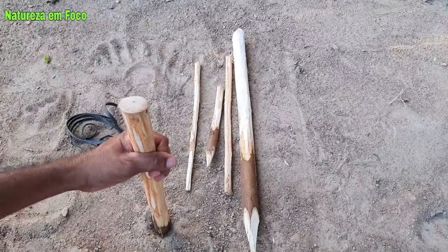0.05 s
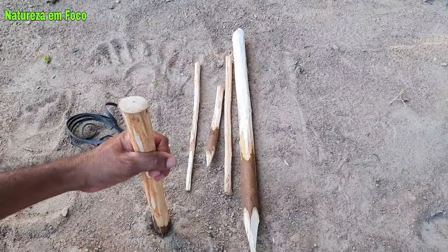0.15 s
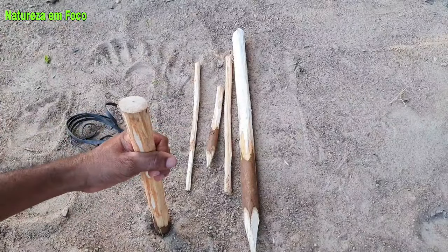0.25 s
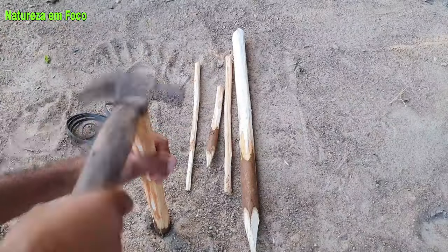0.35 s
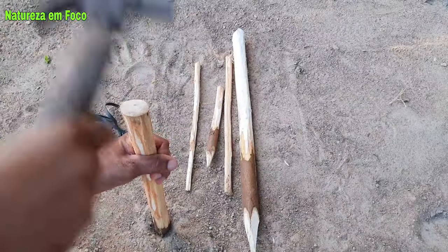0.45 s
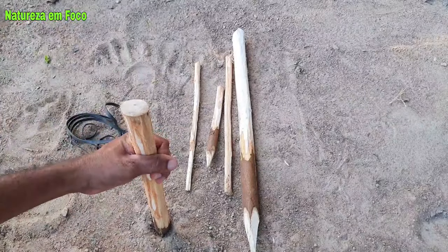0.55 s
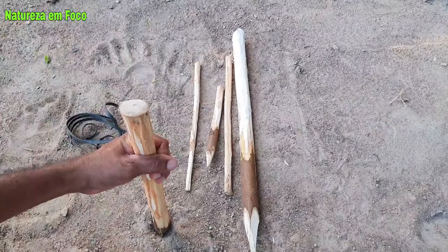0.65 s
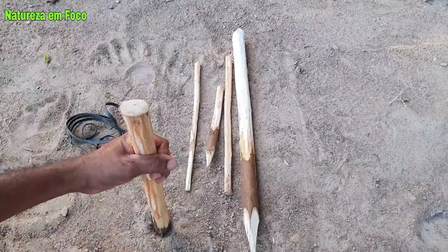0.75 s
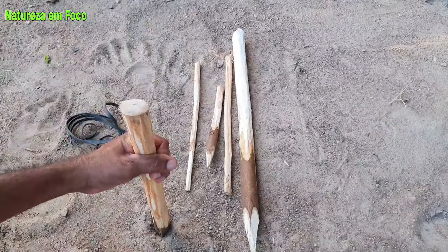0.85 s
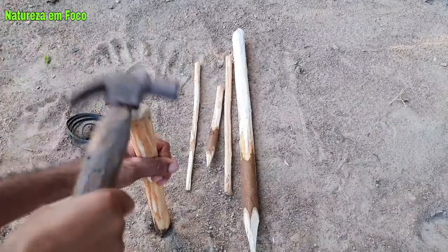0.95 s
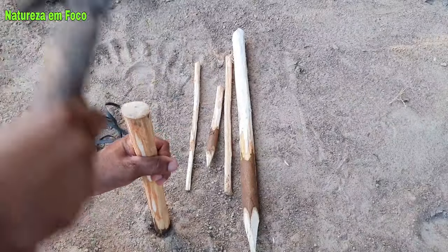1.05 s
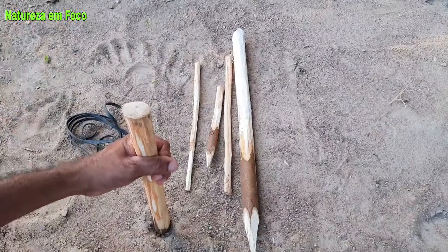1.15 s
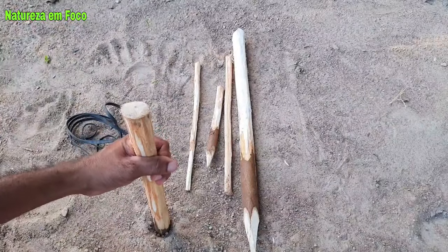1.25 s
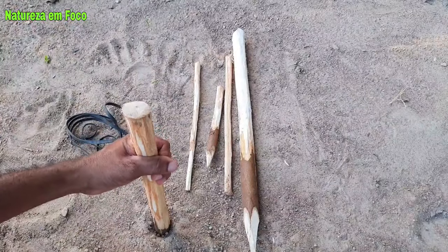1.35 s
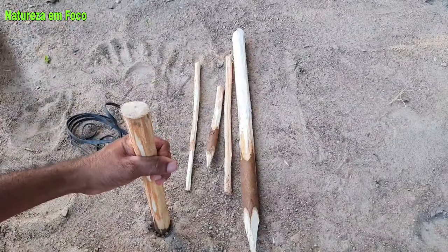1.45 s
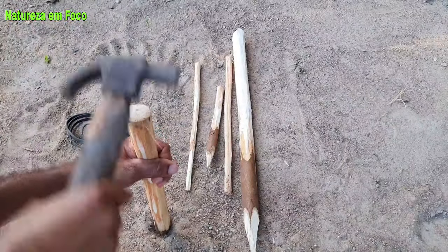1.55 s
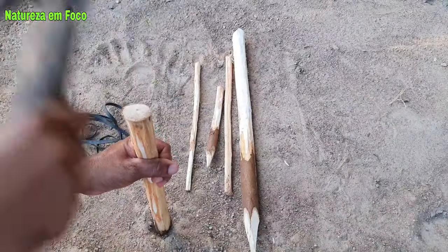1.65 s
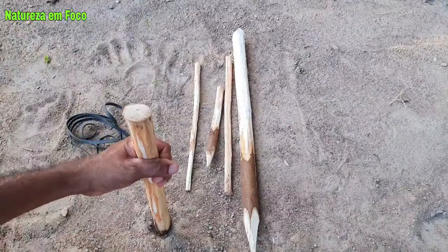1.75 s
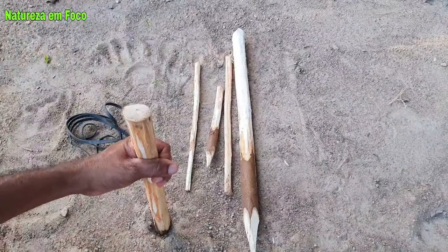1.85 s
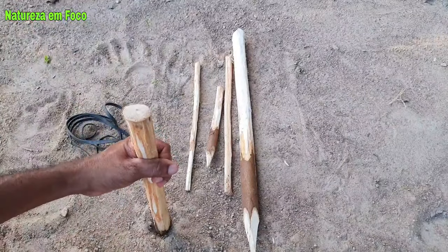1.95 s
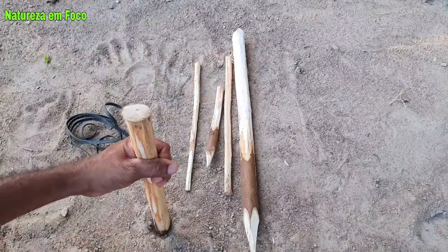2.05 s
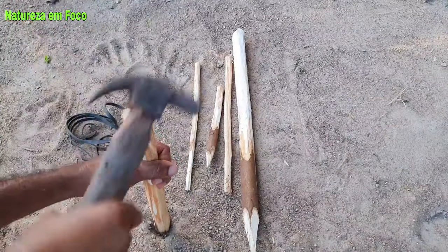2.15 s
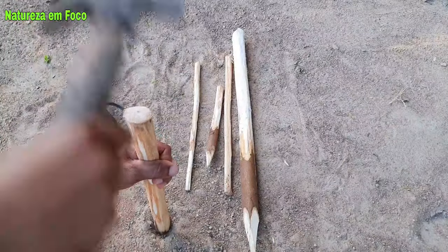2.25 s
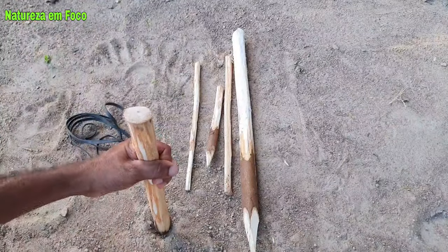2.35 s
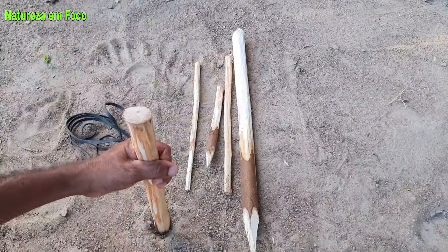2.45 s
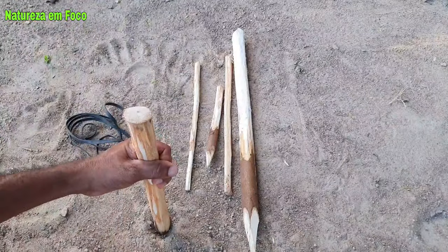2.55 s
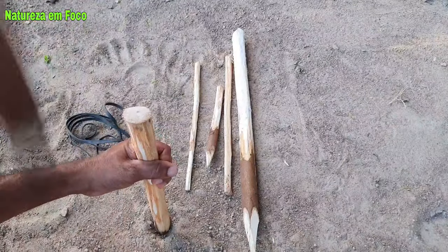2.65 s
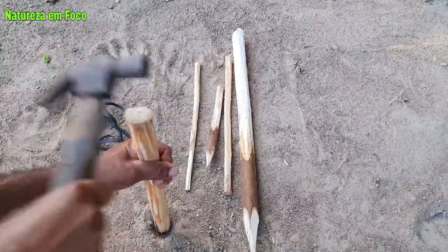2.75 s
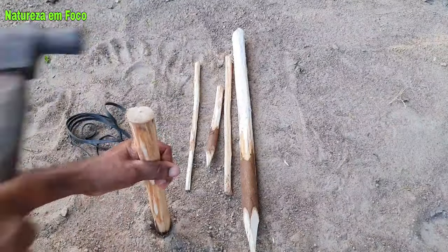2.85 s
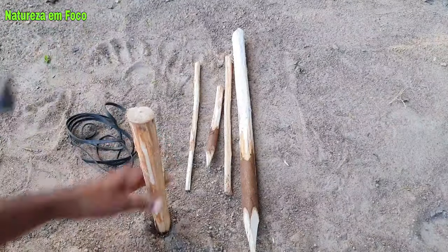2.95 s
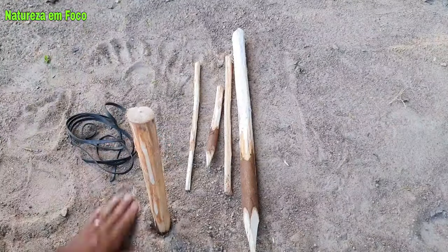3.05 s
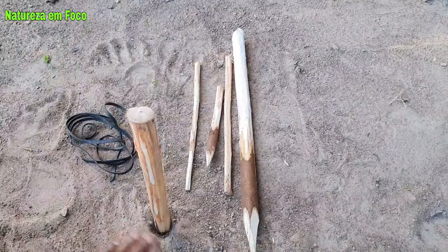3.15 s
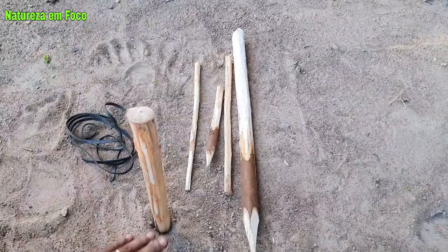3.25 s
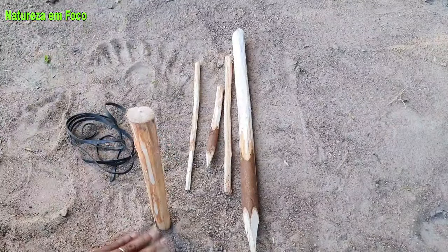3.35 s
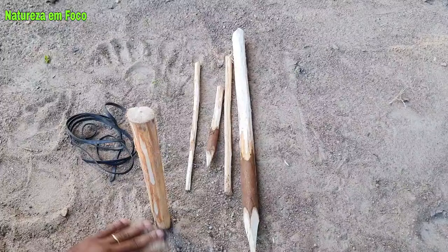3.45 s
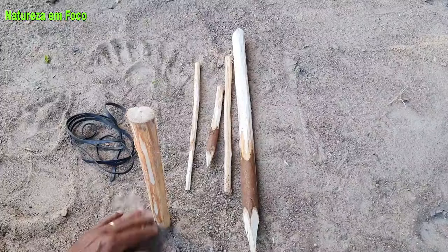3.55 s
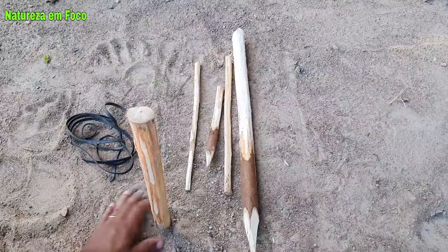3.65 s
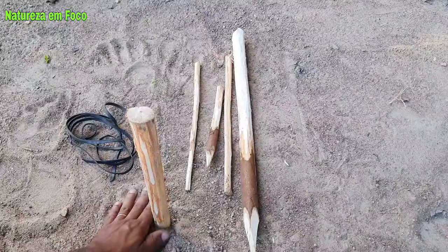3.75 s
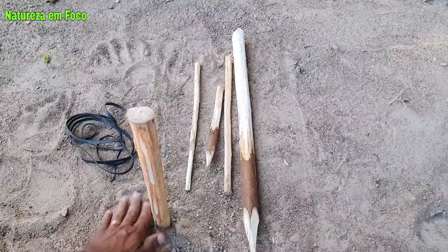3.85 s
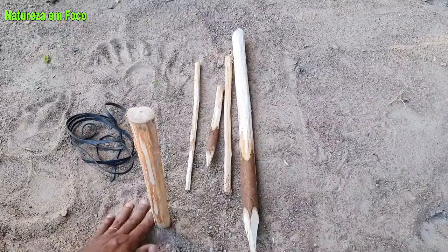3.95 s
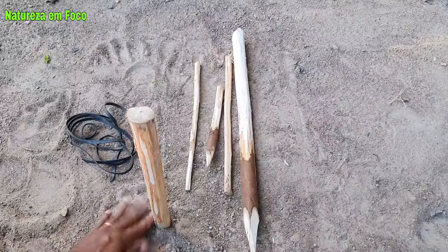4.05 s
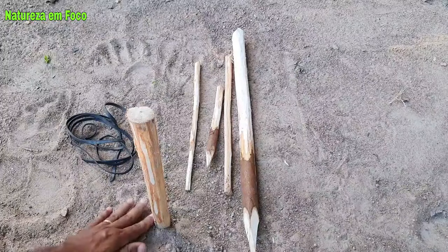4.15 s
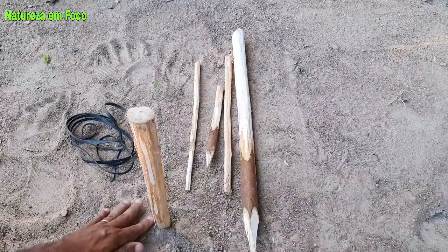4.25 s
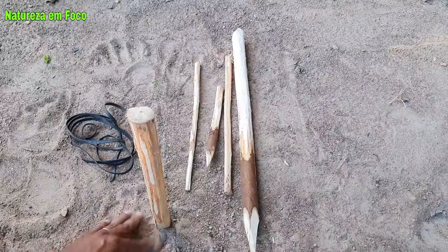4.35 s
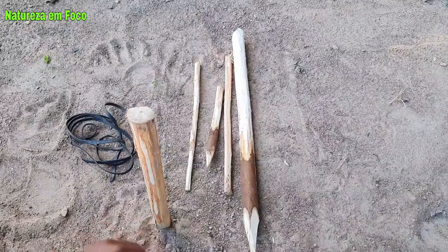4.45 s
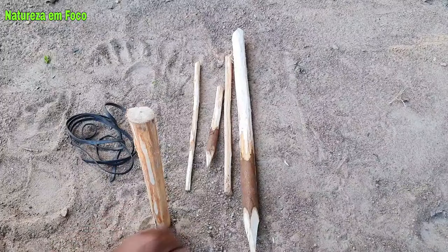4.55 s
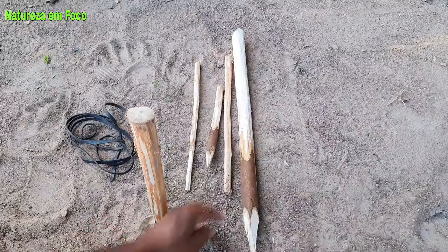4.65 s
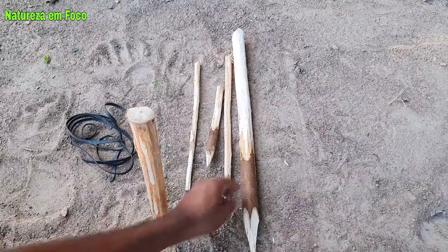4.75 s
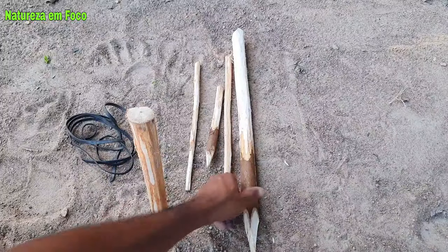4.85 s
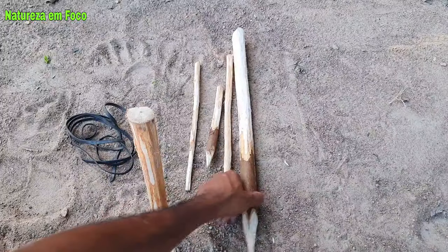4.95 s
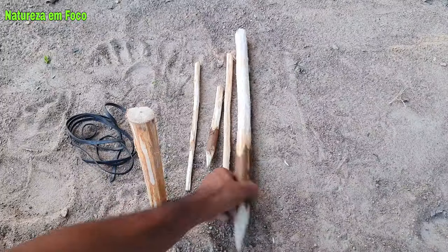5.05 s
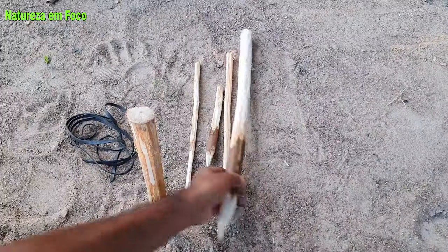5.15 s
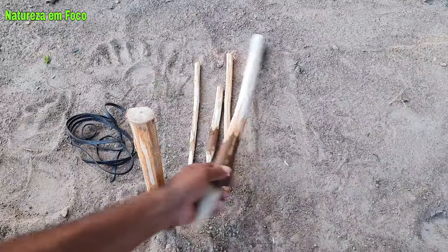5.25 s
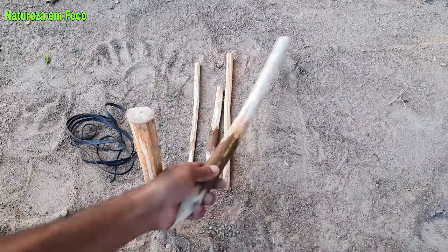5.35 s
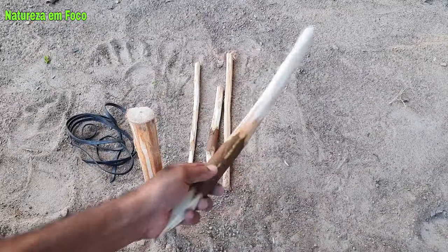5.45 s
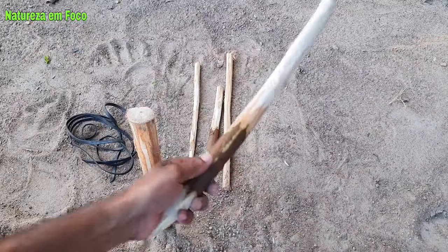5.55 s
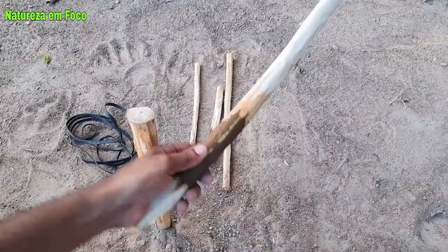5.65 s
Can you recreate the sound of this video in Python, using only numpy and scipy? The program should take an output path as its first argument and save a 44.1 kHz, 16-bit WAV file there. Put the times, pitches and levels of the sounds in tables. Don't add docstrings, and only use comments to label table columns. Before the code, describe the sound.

Close, slightly left, a steel hammer hits a wooden stake five times, about every 0.6 seconds, with dry woody knocks, low sandy thumps and brief scattered echoes. Then a palm softly pats the sand, fingers rustle, and sticks click as one is lifted. A cicada chorus drones throughout with faint birds and a distant engine. Open outdoor place, close stereo microphone.

```python
import sys
import numpy as np
from scipy import signal
from scipy.io import wavfile

SR = 44100
rng = np.random.default_rng(int(sys.argv[2]) if len(sys.argv) > 2 else 0)


def log_audio(samples):
    frames = np.atleast_2d(samples).T
    limited = np.clip(frames, -1, 1)
    pcm = np.round(limited * 32767).astype(np.int16)
    wavfile.write(sys.argv[1], SR, pcm)


def magnitude_from_level(level_db):
    exponent = np.asarray(level_db, float) / 20
    return 10 ** exponent


N = 250929
TIME = np.arange(N) / SR

# start_s, knock_hz, crack_db, steel_db, ground_echo_db
BLOWS = [
    (0.5012, 920, -10.5, -43.5, -26),
    (1.0914, 930, -19.5, -44.5, -26),
    (1.66, 960, -14, -40, -19),
    (2.2783, 980, -7, -45, -22.5),
    (2.8621, 896, -19, -35, -14),
]
# pitch_hz, level_db, t60_s
STAKE_MODES = [(520.7, -19.5, 0.03), (733, -16.5, 0.016), (1385, -7.5, 0.011), (1646, -12.5, 0.0069),
               (1900, -17.5, .009), (2280, -11.5, .011), (2572, -8.5, 0.013), (2950, -17, 0.013),
               (3200, -13.5, .009), (3550, -17, 0.014), (3800, -15.5, 0.02), (4150, -16, 0.01),
               (4250, -18.5, 0.0088)]
# pitch_hz, level_db, t60_s
STEEL_MODES = [(5298, 0, .19), (5483, -2, .07), (6880, -5, .03), (7700, 4, .012)]
# travel_s, start_hz, end_hz, glide_s, t60_s
SAND_WAVE = (.0038, 215, 62, .012, .068)
# pitch_hz, level_db (per Hz)
ECHO_SPECTRUM = [(250, -11), (500, -15), (900, -4.5), (1500, -18), (2500, -10), (4000, -21), (6500, -22.5),
                 (10000, -31.5), (14500, -29), (16000, -40)]
# pitch_hz, t60_s
ECHO_T60 = [(250, .1), (1000, .19), (2500, .28), (6000, .3), (14000, .36)]
# pitch_hz, likeness (0 to 1)
LIKENESS = [(60, 0.84), (130, 0.72), (290, 0.62), (640, 0.11), (1410, 0.07), (3100, 0.02), (6820, 0.7),
            (15000, 0.041)]
# time_s, level_db
BREEZE = [(0, -6), (.3, -0.5), (2.9, 1), (3.6, 2.5), (4.4, 7), (5.2, 10), (5.69, 8.5)]
# pitch_hz, level_db (per Hz)
RUMBLE_SPECTRUM = [(30, -29.5), (55, -0.5), (100, 0), (170, -12), (250, -12.5), (350, -24), (480, -32)]
# pitch_hz, level_db (per Hz)
HISS_SPECTRUM = [(260, -30), (450, -7), (576, -9), (965, -3.5), (1270, -8.5), (1540, -4), (3390, -7.5),
                 (4800, -7), (6240, -37), (10600, -120)]
# pitch_hz, level_db (per Hz)
TOP_SPECTRUM = [(7500, -6), (9000, 1), (11500, -2.5), (14000, 4.5), (15500, 2)]
# pitch_hz, width_hz, level_db
FAR_DRONES = [(830, 60, -92), (970, 60, -88), (1600, 70, -81.5), (3180, 160, -87)]
# pitch_hz, level_db (per Hz)
CHORUS_SPECTRUM = [(2710, -42), (4600, -40.5), (5010, -1.5), (5270, -11), (5450, -4), (5840, 0),
                   (6920, 2.5), (7430, -11.5), (7850, -20.5), (8200, -18), (10700, -52.5), (18000, -120)]
# delay_s, length_s, start_hz, end_hz, level_db
CALL_PARTS = [
    (0, 0.37, 5300, 5570, 2),
    (.16, .34, 4920, 5100, 0),
    (.21, .3, 5120, 5270, -2),
]
# pitch_hz, width_hz, level_db
ENGINE_ORDERS = [(77.2, 14, 3), (154.2, 4, 1), (116, 10, -9.5), (190, 7.3, -9.5)]
# time_s, load_db, strain_db (moved to the upper orders)
ENGINE_EFFORT = [(0, -65, -4.5), (.55, -60.5, 0.5), (.8, -63.5, -0.5), (1.15, -61, 1.5), (1.85, -65, -1),
                 (2.1, -63, -1), (2.6, -66.5, -4), (3.0, -62.5, -2), (3.18, -55, 1), (3.5, -62.5, -2.5),
                 (3.75, -57, -8.5), (4.05, -57.5, 3.5), (4.5, -53, -0.5), (4.75, -64, 2.5), (5.0, -59, -2),
                 (5.35, -66, -1.5), (5.47, -52, -1.5), (5.69, -61, 5)]
# start_s, length_s, start_hz, end_hz, level_db
BIRDS = [(.01, .21, 1620, 1610, -83), (0.251, .12, 2950, 1710, -73.5), (1.2, .1, 1625, 1600, -83),
         (0.641, 0.15, 1900, 1536, -70), (1.39, .16, 3093, 3300, -86.5), (1.47, 0.068, 2140, 1530, -73.5),
         (1.512, 0.061, 2060, 1750, -77), (1.774, 0.038, 3450, 3270, -75.5), (1.778, 0.18, 2220, 1535, -69),
         (1.796, .04, 2590, 2750, -75), (1.847, .03, 3230, 3390, -71.5), (2.041, .022, 1970, 1768, -67),
         (2.1, 0.61, 1678, 1698, -75.5), (2.191, 0.074, 3460, 3100, -81), (3.521, 0.0594, 4240, 3970, -76),
         (3.965, .015, 4290, 3200, -80), (4.077, .015, 4220, 3100, -69.5), (4.089, .05, 3900, 3980, -76),
         (4.396, .03, 1793, 1820, -76.5), (4.72, 0.13, 992, 985, -79.5), (5.653, .03, 4000, 3100, -80)]
# start_s, length_s, level_db
STROKES = [
    (3.96, 0.063, -73),
    (4.06, .12, -70.5),
    (4.876, .25, -72.5),
    (5.07, 0.23, -68.5),
    (5.293, 0.15, -63.5),
    (5.65, .1, -76.5),
]
# start_s, peak_db, strongest_hz
TICKS = [(2.619, -69.5, 9000), (3.9704, -63.5, 3900), (4.0826, -60, 3900), (4.8897, -62, 2500),
         (5.1422, -49, 4150), (5.1995, -52, 2730), (5.3174, -58.5, 3900), (5.345, -59, 3400),
         (5.3596, -55, 3400), (5.3813, -47.5, 3400), (5.3994, -60, 2700), (5.4596, -64.5, 4200),
         (5.5293, -61, 4040), (5.668, -61.5, 3400)]
# pitch_hz, level_db, t60_s
STICK_MODES = [(2220, -16, 0.12), (2730, -5.5, 0.044), (3350, -6.5, 0.036), (3932, -3, 0.036),
               (4390, -2.5, 0.03), (9000, -19.5, .006)]

EARLIER_BLOW_S, EARLIER_LOSS_DB = -0.053, -3
CONTACT_S, BUILD_S = 0.0035, 0.0011
KNOCK_DB = 0.28
THUMP_DB, THUMP_GROWS_DB = -14.5, 1.3
CRACK_LIKENESS = 0.44
RIGHT_LAG_S, RIGHT_DB = 0.00018, -3
GRAIN_LAG_S, GRAIN_RIGHT_DB = 0.00012, -3.5

SCATTER_DB, SCATTER_TILT_DB, SOFT_CRACK_DB = -42, -3, -16.5
SCATTER_FOLLOWS, TILT_FOLLOWS = 0.25, 0.2
SCATTER_DELAY_S, SCATTER_BUILD_S = 0.002, 0.012
FAR_SCATTER_DB, FAR_DELAY_S, FAR_T60_S, FAR_FADES_DB = 9, 0.05, 1.2, -1.0

RUMBLE_DB, HISS_DB, TOP_DB, CHORUS_DB = -63.5, -73, -81.5, -63
RUMBLE_FOLLOWS, HISS_FOLLOWS, TOP_FOLLOWS = 0.9, 0.66, 0.81
CALL_DB, CALL_START_S, CALL_EVERY_S, CALL_WIDTH_HZ = -68, -0.06, 0.829, 135
CALL_SWELL, CALL_FADE = 0.2, 0.052
STEADY_SHARE, ORDER_WANDER_DB = 0.7, 3
START_SPEED, SLOWS_FROM_S, SLOWS_PER_S = 1.04, 2.8, 0.032
BIRD_PAN_DB = 0.5

PAT_S, GRIT_LATE_S, PAT_ATTACK_S, PAT_T60_S = 3.168, 0.002, 0.04, 0.42
PAT_GRIT_DB, PUFF_DB = -55, -52
SHUFFLE_DB, SHUFFLE_S, SHUFFLE_LENGTH_S = -71, 3.85, 1.2
FAVOUR_DB = 26


def in_time(rows):
    s, *columns = np.transpose(rows)
    return [np.interp(TIME, s, column) for column in columns]


def at_hz(points, hz):
    pitch_hz, value = np.transpose(points)
    return np.interp(np.log(hz), np.log(pitch_hz), value)


def rms_one(x):
    return x / np.sqrt(np.mean(x ** 2) + 1e-20)


def drift(rate):
    knots = int(N / SR * rate * 2) + 3
    return np.interp(TIME, np.linspace(0, N / SR, knots), rng.standard_normal(knots)) * 1.2


def burst(s, attack_s, t60):
    t = np.maximum(TIME - s, 0)
    return np.minimum(t / attack_s, 1) ** 2 * magnitude_from_level(-60 * np.maximum(t - attack_s, 0) / t60)


def arch(s, length):
    return np.sin(np.pi * np.clip((TIME - s) / length, 0, 1)) ** 0.36


def ring(clicks, hz, t60):
    r, w = magnitude_from_level(-60 / (t60 * SR)), 2 * np.pi * hz / SR
    return signal.lfilter([0, np.sin(w)], [1, -2 * r * np.cos(w), r * r], clicks + 1e-18)


def band_passed(x, low_hz, high_hz, order=2):
    return signal.sosfilt(signal.butter(order, [low_hz, high_hz], "band", fs=SR, output="sos"), x)


def bands(low_hz, high_hz, step):
    edges = low_hz * 2 ** np.arange(0, np.log2(high_hz / low_hz) + 0.01, step)
    white = rng.standard_normal((2, 2, N))
    for k, (low, high) in enumerate(zip(edges, edges[1:])):
        mid, side = band_passed(white[k % 2], low, high)
        alike = np.clip(at_hz(LIKENESS, low), 0, 1)
        stereo = np.sqrt(1 + alike) * mid + np.sqrt(1 - alike) * side * [[1], [-1]]
        yield np.sqrt(low * high), stereo


def coloured(spectrum, step, patchy_db, rate):
    total = 0
    for hz, band in bands(spectrum[0][0], spectrum[-1][0], step):
        total = total + magnitude_from_level(at_hz(spectrum, hz) + patchy_db * drift(rate)) * band
    return rms_one(total)


def narrow(hz, width_hz):
    low_pass = signal.butter(2, width_hz / 2, fs=SR, output="sos")
    wobble = signal.sosfilt(low_pass, rng.standard_normal((2, N)))
    phase = 2 * np.pi * np.cumsum(hz * np.ones(N)) / SR
    return rms_one(wobble[0] * np.cos(phase) + wobble[1] * np.sin(phase))


def placed(x, lag_s, right_db):
    t = TIME[:len(x)]
    return np.array([x, magnitude_from_level(right_db) * np.interp(t - lag_s, t, x)])


def echoes():
    starts = [(EARLIER_BLOW_S, EARLIER_LOSS_DB, 0)]
    starts += [(row[0], 0, row[2] - SOFT_CRACK_DB) for row in BLOWS]
    out = 0
    for hz, band in bands(250, 16000, 1 / 2):
        octaves = np.log2(hz / 2000)
        shape = 0
        for s, loss_db, sharp_db in starts:
            t = np.maximum(TIME - s - SCATTER_DELAY_S, 0)
            db = SCATTER_DB + loss_db + SCATTER_FOLLOWS * sharp_db
            db += (SCATTER_TILT_DB + TILT_FOLLOWS * sharp_db) * octaves
            build = np.minimum(t / SCATTER_BUILD_S, 1)
            shape = shape + magnitude_from_level(db - 60 * t / at_hz(ECHO_T60, hz)) * build
        out = out + magnitude_from_level(at_hz(ECHO_SPECTRUM, hz) + 22.0) * magnitude_from_level(2.0 * drift(45)) * shape * band
    return out * magnitude_from_level([[1.2], [-1.2]])


def background():
    breeze_db, = in_time(BREEZE)
    starts = [EARLIER_BLOW_S] + [row[0] for row in BLOWS]
    returned = sum(magnitude_from_level(FAR_FADES_DB * nth) * burst(s, FAR_DELAY_S, FAR_T60_S) for nth, s in enumerate(starts))
    swell = 1 + magnitude_from_level(FAR_SCATTER_DB) * returned
    rumble = coloured(RUMBLE_SPECTRUM, 1 / 2, patchy_db=1.2, rate=6.0)
    hiss = coloured(HISS_SPECTRUM, 1 / 2, patchy_db=0.8, rate=8.0)
    air = magnitude_from_level(RUMBLE_DB + RUMBLE_FOLLOWS * breeze_db) * rumble
    air = air + magnitude_from_level(HISS_DB + HISS_FOLLOWS * breeze_db) * hiss
    drone = sum(magnitude_from_level(db + 2.0 * drift(0.96)) * narrow(hz, width_hz) for hz, width_hz, db in FAR_DRONES)
    return swell * air + np.array([drone, np.roll(drone, 9000)])


def cicada_chorus():
    breeze_db, = in_time(BREEZE)
    chorus = coloured(CHORUS_SPECTRUM, 1 / 10, patchy_db=-0.5, rate=11.0) + magnitude_from_level(-9.0) * narrow(6860, 50)
    top_hiss = coloured(TOP_SPECTRUM, 0.26, patchy_db=0.6, rate=2.8)
    return magnitude_from_level(CHORUS_DB + 0.6 * drift(1.7)) * chorus + magnitude_from_level(TOP_DB + TOP_FOLLOWS * breeze_db) * top_hiss


def near_insect():
    out = np.zeros((2, N))
    throb = 1 + 0.12 * np.sin(2 * np.pi * 68.0 * TIME + 1.5 * drift(7.1))
    for delay, length, start_hz, end_hz, part_db in CALL_PARTS:
        u = (TIME - CALL_START_S - delay) % CALL_EVERY_S / length
        on = (u < 1) & (TIME > CALL_START_S + delay)
        edges = np.minimum(u / CALL_SWELL, (1 - u) / CALL_FADE)
        gain = on * magnitude_from_level(CALL_DB + part_db) * np.minimum(1, edges)
        voice = narrow(start_hz + (end_hz - start_hz) * on * u ** 0.6, CALL_WIDTH_HZ)
        diffuse = 0.5 * np.array([[1], [-1]]) * np.roll(voice, 4000)
        out += gain * throb * (voice + diffuse)
    return out


def engine():
    load_db, strain_db = in_time(ENGINE_EFFORT)
    speed = START_SPEED - SLOWS_PER_S * np.maximum(TIME - SLOWS_FROM_S, 0) + 0.0095 * drift(1.2)
    out = 0
    for k, (hz, width_hz, db) in enumerate(ENGINE_ORDERS):
        phase = 2 * np.pi * np.cumsum(hz * speed) / SR + 1.5 * drift(width_hz / 2)
        tone = np.sqrt(2) * np.sin(phase)
        order = STEADY_SHARE * tone + (1 - STEADY_SHARE) * narrow(hz * speed, width_hz)
        level_db = load_db - strain_db * (-1) ** k + db + ORDER_WANDER_DB * drift(4.0)
        out = out + magnitude_from_level(level_db) * order
    return out


def birds():
    out = np.zeros((2, N))
    for s, length, start_hz, end_hz, db in BIRDS:
        u = np.clip((TIME - s) / length, 0, 1)
        hz = start_hz * (end_hz / start_hz) ** u ** 0.85 * (1 + 0.004 * drift(30))
        tone = np.sin(2 * np.pi * np.cumsum(hz) / SR)
        gain = magnitude_from_level(db + 7 + 1.3 * drift(30)) * np.sin(np.pi * u) ** 0.5
        out += gain * tone * magnitude_from_level([[BIRD_PAN_DB], [-BIRD_PAN_DB]])
    return out + 0.3 * np.roll(out[::-1], 500, axis=1)


def stake_knock(click, t, swell, knock_hz):
    t = t[:220]
    stay = np.sin(np.pi * np.minimum(t / CONTACT_S, 1) ** 0.85)
    knock = signal.lfilter(np.sin(2 * np.pi * knock_hz * t) * stay, 1, click)
    return knock + 0.15 * swell * ring(click, knock_hz, 0.018)


def stake_wood(click, swell):
    out = 0
    for k, (hz, db, t60) in enumerate(STAKE_MODES):
        uneven_db, uneven_hz = 2.5 * rng.standard_normal(), 0.015 * rng.standard_normal()
        out = out + magnitude_from_level(db + uneven_db) * ring(click, hz * (1 + uneven_hz), t60) * (-1) ** k
    return swell * out


def steel_head(click, swell, steel_db):
    return swell * sum(magnitude_from_level(steel_db + db) * ring(click, hz, t60) for hz, db, t60 in STEEL_MODES)


def crack(click, t, crack_db):
    left, other = rng.standard_normal((2, len(t)))
    right = CRACK_LIKENESS * np.roll(left, 8) + (1 - CRACK_LIKENESS) * other
    splinter = np.array([left, magnitude_from_level(GRAIN_RIGHT_DB) * right])
    decay = signal.lfilter([1], [1, -magnitude_from_level(-60 / (0.013 * SR))], click)
    noise = magnitude_from_level(crack_db) * np.minimum(t / 0.0003, 1) * splinter * decay
    return band_passed(noise, 3000, 8000, order=1)


def sand_thump(t):
    travel, start_hz, end_hz, glide, t60 = SAND_WAVE
    late = np.maximum(t - travel, 0)
    turns = end_hz * late + (start_hz - end_hz) * glide * (1 - np.exp(-late / glide))
    wave = np.sin(2 * np.pi * turns) * magnitude_from_level(-60 * late / t60) * np.minimum(late / 0.001, 1)
    tip_click = np.zeros(len(t))
    tip_click[int(0.0052 * SR)] = 1
    return wave + 0.5 * ring(tip_click, 340, 0.032)


def blows():
    out, length = np.zeros((2, N)), int(0.3 * SR)
    t = TIME[:length]
    swell = np.minimum(t / BUILD_S, 1)
    wave = sand_thump(t) * magnitude_from_level([[0], [-1.8]])
    for nth, (s, knock_hz, crack_db, steel_db, second_db) in enumerate(BLOWS):
        click = np.zeros(length)
        click[0], click[int(0.0046 * SR)] = 1, magnitude_from_level(second_db)
        body = magnitude_from_level(KNOCK_DB) * stake_knock(click, t, swell, knock_hz) + steel_head(click, swell, steel_db)
        grain = magnitude_from_level(KNOCK_DB) * stake_wood(click, swell)
        i = int(s * SR)
        blow = out[:, i:i + length]
        blow += placed(body, RIGHT_LAG_S, RIGHT_DB)
        blow += placed(grain, GRAIN_LAG_S, GRAIN_RIGHT_DB)
        blow += magnitude_from_level(THUMP_DB + THUMP_GROWS_DB * nth) * wave + crack(click, t, crack_db)
    return out


def grit(per_s, low_hz, high_hz):
    slips = rng.random((2, N)) < per_s / SR
    force_db = 2.0 * np.minimum(rng.exponential(1, (2, N)), 4)
    clicks = slips * magnitude_from_level(force_db) * rng.choice([-1, 1], (2, N))
    return rms_one(band_passed(clicks, low_hz, high_hz))


def palm():
    pat = magnitude_from_level(PAT_GRIT_DB) * burst(PAT_S + GRIT_LATE_S, PAT_ATTACK_S, PAT_T60_S) * grit(2500, 1120, 2600)
    puff = magnitude_from_level(PUFF_DB) * burst(PAT_S, PAT_ATTACK_S / 2, 0.28)
    shuffle = magnitude_from_level(SHUFFLE_DB + 3.96 * drift(5.0)) * arch(SHUFFLE_S, SHUFFLE_LENGTH_S)
    return pat + (puff + shuffle) * narrow(350, 130)


def sticks(stroke):
    rub = stroke * grit(120, 1500, 6000)[0] * magnitude_from_level(-29.0)
    clicks = np.zeros((len(STICK_MODES), N)) + rub
    stick_hz = np.array(STICK_MODES)[:, :1]
    for s, db, best_hz in TICKS:
        hops = s + np.cumsum(np.r_[0, rng.uniform(0.0015, 0.004, 2)])
        uneven_db = 2.0 * rng.standard_normal((len(STICK_MODES), 1))
        away_db = FAVOUR_DB * abs(np.log2(stick_hz / best_hz))
        clicks[:, (hops * SR).astype(int)] = magnitude_from_level(db + 0.5 - 6.7 * np.arange(3) + uneven_db - away_db)
    ticks = sum(magnitude_from_level(db) * ring(own, hz, t60) for own, (hz, db, t60) in zip(clicks, STICK_MODES))
    ticks += 1.5 * ring(clicks[-2], 4930, 0.0043)
    return placed(ticks, -0.000033, -1.1)


def hand():
    stroke = sum(magnitude_from_level(db) * arch(s, length) for s, length, db in STROKES)
    rustle = stroke * (0.6 * grit(6000, 1900, 4800) + 0.35 * grit(4000, 5000, 14000))
    return palm() + rustle + sticks(stroke)


def scene():
    return echoes() + background() + cicada_chorus() + near_insect() + engine() + birds() + blows() + hand()


def top_cut(x):
    return signal.sosfilt(signal.butter(12, 16700, fs=SR, output="sos"), x)


def record(dry):
    held = signal.sosfilt(signal.butter(2, 45, "high", fs=SR, output="sos"), dry)
    held = 1.1 * np.tanh(held / 1.1)
    held = signal.sosfilt(signal.cheby2(10, 50, 16700, fs=SR, output="sos"), held)
    return top_cut(held)


dry = scene()
out = record(dry)
log_audio(out)
```